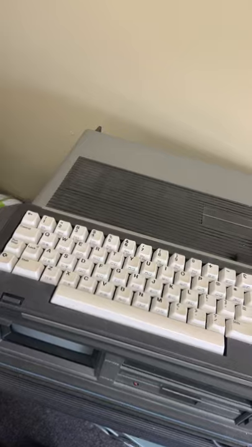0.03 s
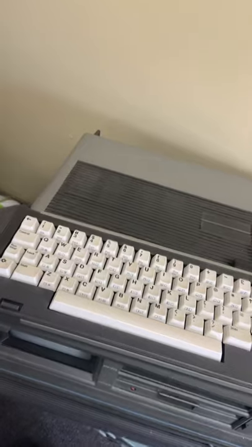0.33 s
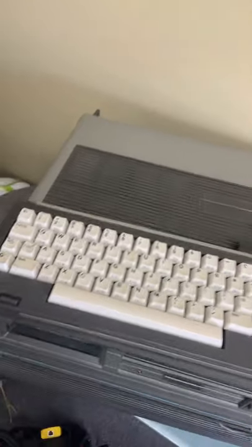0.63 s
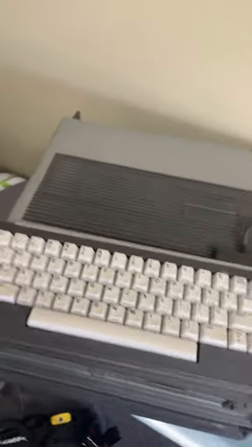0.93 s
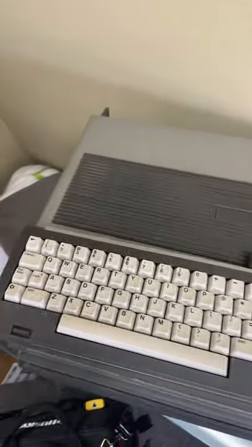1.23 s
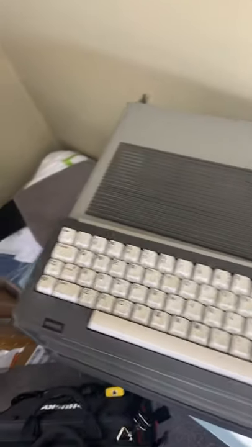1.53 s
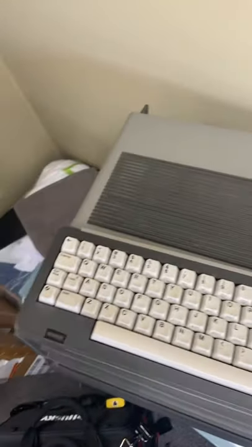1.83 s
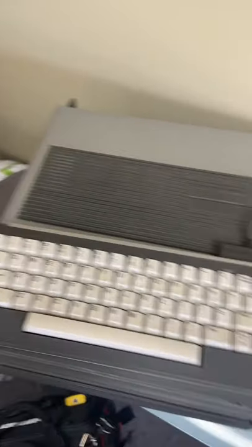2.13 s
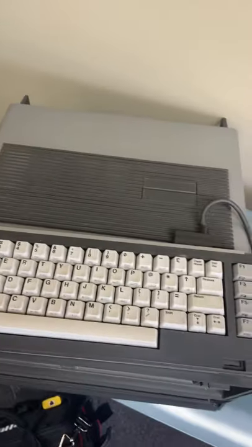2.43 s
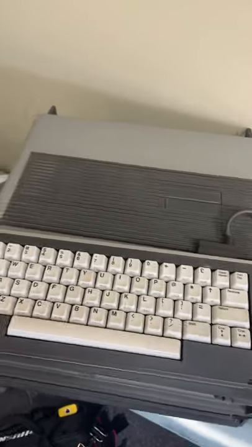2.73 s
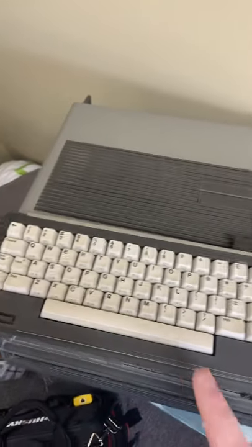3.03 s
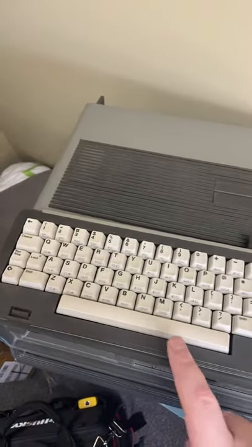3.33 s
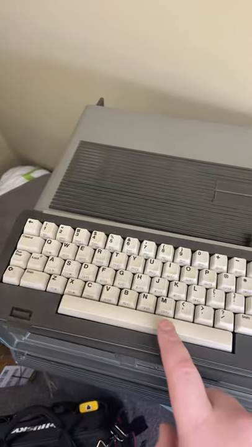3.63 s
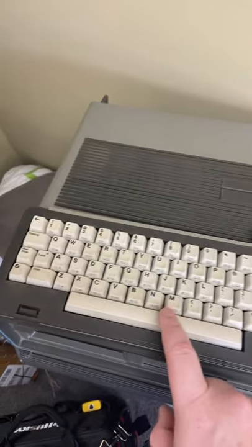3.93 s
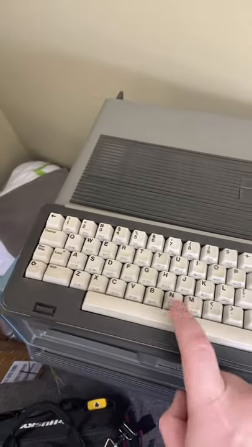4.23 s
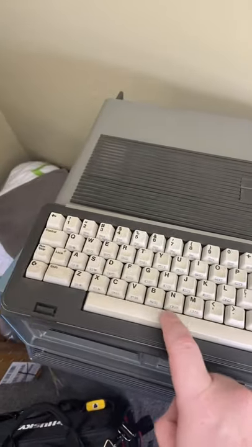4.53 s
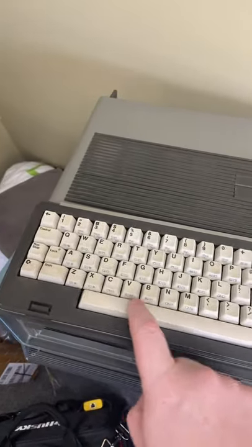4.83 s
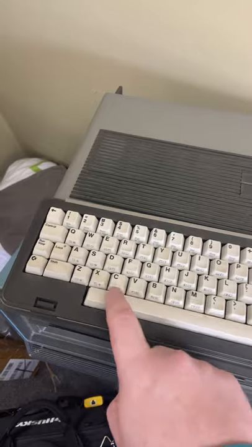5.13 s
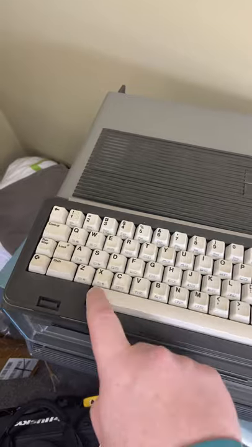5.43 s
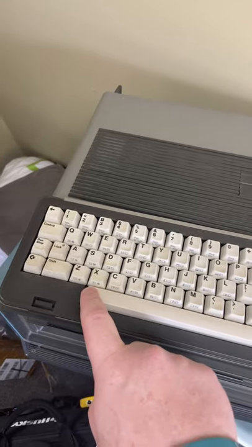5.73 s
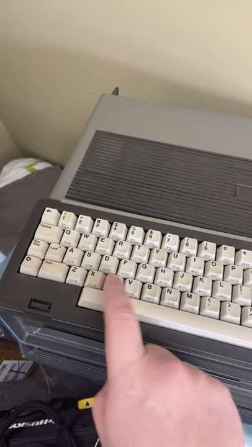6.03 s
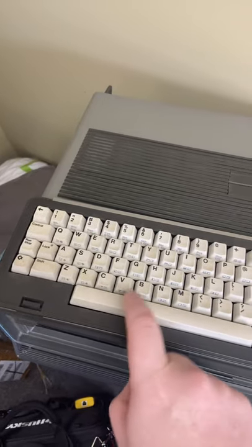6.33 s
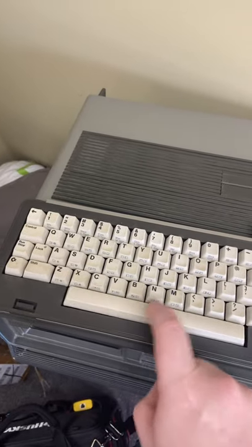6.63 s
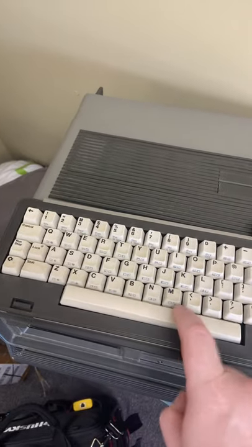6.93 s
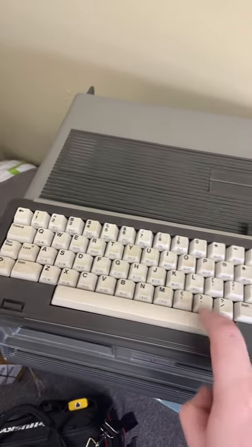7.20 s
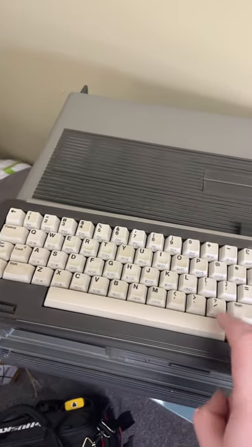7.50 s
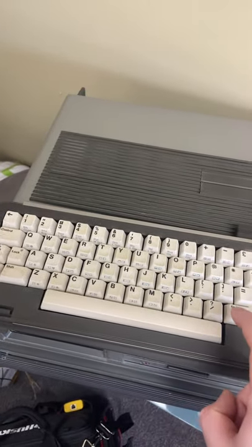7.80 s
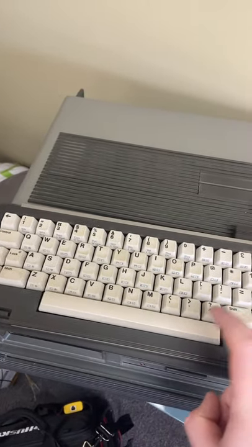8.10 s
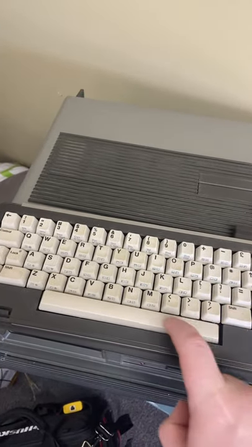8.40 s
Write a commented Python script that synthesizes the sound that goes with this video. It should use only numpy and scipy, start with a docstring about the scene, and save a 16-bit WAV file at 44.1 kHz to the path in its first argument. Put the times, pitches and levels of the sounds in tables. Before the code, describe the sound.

Rapid, rattly clacks of an old keyboard's space bar going down and springing back, over faint room hum.

```python
"""Tapping a loose space bar.

A finger taps along the space bar of an old home computer in a small, quiet room. The bar clacks
against its stops going down and coming up, each blow a flurry of tiny contacts ringing the plastic.
Its stabiliser wire rattles and pings in the clips, and the hollow case thumps underneath.
A faint hum and room rumble lie behind; a sleeve brushes by before the first tap."""
import sys
import numpy as np
from scipy import signal
from scipy.fft import rfft, irfft
from scipy.io import wavfile

SR = 44100
rng = np.random.default_rng(int(sys.argv[2]) if len(sys.argv) > 2 else 0)


def generate_wav(sig):
    """Save sig (samples, or channels by samples) to the path in sys.argv[1] as 16-bit PCM at SR."""
    pcm = np.round(np.clip(np.atleast_2d(sig).T, -1, 1) * 32767).astype(np.int16)
    wavfile.write(sys.argv[1], SR, pcm)


N = 377496


def from_db(db):
    """Decibels to gain."""
    return 10 ** (np.asarray(db) / 20)


def rms_one(x):
    """Scale to rms 1."""
    return x / np.sqrt(np.mean(x ** 2) + 1e-20)


def at_hz(points, hz):
    """Read a curve on a log-frequency axis."""
    known_hz, values = np.transpose(points)
    return np.interp(np.log(np.maximum(hz, 1)), np.log(known_hz), values)


def butter(x, hz, kind, order=2):
    """Causal Butterworth filter."""
    return signal.sosfilt(signal.butter(order, hz, kind, fs=SR, output="sos"), x + 1e-18)


def equalise(x, curve, size=8192):
    """Minimum-phase EQ: nothing sounds ahead of the attack."""
    gain = from_db(at_hz(curve, np.fft.rfftfreq(size, 1 / SR)))
    cepstrum = irfft(np.log(gain))
    cepstrum[1:size // 2] *= 2
    cepstrum[size // 2 + 1:] = 0
    impulse = irfft(np.exp(rfft(cepstrum)))
    return signal.fftconvolve(x, impulse)[:len(x)]


def resonate(x, hz, width_hz):
    """One resonance with unity gain at its peak."""
    radius = np.exp(-np.pi * width_hz / SR)
    feedforward = np.array([1, 0, -1]) * (1 - radius * radius) / 2
    feedback = [1, -2 * radius * np.cos(2 * np.pi * hz / SR), radius * radius]
    return signal.lfilter(feedforward, feedback, x + 1e-18)


def add(track, s, sound):
    """Mix a sound into a track at time s."""
    start = int(s * SR)
    track[start:start + len(sound)] += sound[:N - start]


# Hum tones: (frequency [Hz], line width [Hz], level against the rumble [dB])
HUM_TONES = [(54.9, 8.1, -9.5), (231.2, 4.13, -7.5)]
def hum():
    """Low, steady tones, each blurred by a wandering phase."""
    out = np.zeros(N)
    for hz, width_hz, db in HUM_TONES:
        wander = np.sqrt(2 * np.pi * width_hz / SR) * rng.standard_normal(N)
        phase = np.cumsum(2 * np.pi * hz / SR + butter(wander, 25, "low"))
        out += from_db(db) * rms_one(np.sin(phase))
    return out


# EQ of the rumble: (frequency [Hz], relative level [dB])
RUMBLE_EQ = [(25, -20.5), (45, -2.5), (70, -1.5), (105, -1), (170, -8), (270, -10), (400, -12),
             (650, -16.5), (1000, -19), (1700, -23.5), (3000, -32), (5000, -35.5), (9000, -41),
             (16000, -50.5)]
# Fader ride on rumble and hum: (time [s], level [dB])
ROOM_TONE_FADER = [(0, -100), (.12, -82), (.32, -62.5), (1, -60.5), (2, -61.5), (3, -59.5), (4, -58),
                   (5.8, -56), (8.56, -57)]
def room_tone():
    """A bed of rumble and faint hum that fades in and slowly grows."""
    rumble = rms_one(equalise(rng.standard_normal(N), RUMBLE_EQ))
    fader_db = np.interp(np.arange(N) / SR, *np.transpose(ROOM_TONE_FADER))
    return from_db(fader_db) * (rumble + hum())


# Brushes of cloth as the hand comes in: (peak time [s], half length [s], level [dB])
SLEEVE_BRUSHES = [(3.023, 0.18, -79), (3.6, .12, -83)]
def sleeve(band_hz=(5000, 14900)):
    """Airy cloth hiss that swells and fades with each reach."""
    t = np.arange(N) / SR
    swell = sum(from_db(db) * np.exp(-((t - s) / half_s) ** 2) for s, half_s, db in SLEEVE_BRUSHES)
    return swell * rms_one(butter(rng.standard_normal(N), band_hz, "band"))


def chatter(settle_s, swell_s, per_s, size=5000):
    """A flurry of tiny contacts that swells, then dies as the loose parts settle; energy 1."""
    t = np.arange(size) / SR
    contacts = (rng.random(size) < per_s / SR) * rng.choice([-1, 1], size)
    swell = 1 - np.exp(-(t / swell_s) ** 2)
    return rms_one(contacts * swell * np.exp(-t / settle_s)) / np.sqrt(size)


# The finger lands, shakes the wire and drives the bar onto its stop: (time [s], travel time [s],
# relative rattle level [dB], strength against an ordinary blow [dB], hardness [dB])
TAP_CUES = [(4.131, .008, -40.5, -26, 11), (4.345, 0.0033, -23.5, 2.5, 3.5), (4.534, 0.01, -34.5, -0.5, 5),
            (4.701, 0.014, -30, -2.5, 1.5), (4.860, 0.007, -33, -11.5, 3), (5.009, .011, -37.5, -7.5, 2.5),
            (5.165, 0.0064, -31.5, -16, -9), (5.311, 0.015, -36, -12, 1), (5.447, 0.011, -37.5, -13.5, 3),
            (5.590, .014, -29, -0.5, 9), (6.130, 0.008, -27.5, 2, 5.5), (6.297, 0.011, -27.5, -0.5, 3.5),
            (6.456, .012, -24, 3.5, 2), (6.616, 0.0082, -26, -2, 2.5), (6.78, .008, -25, 2, 1.5),
            (6.932, 0.0083, -23.5, 6.5, 0.5), (7.098, 0.0092, -24, 2, -2.5), (7.268, 0.0077, -22.5, 5, 4),
            (7.417, 0.0084, -29.5, 4.5, 3.5), (7.572, .008, -21.5, 7, 2.5), (8.229, 0.0035, -28, 11, 5.5),
            (8.414, 0.0093, -24.5, -0.5, 2.5)]
# The freed bar shivers as the finger lifts: (time [s], relative rattle level [dB])
LIFT_CUES = [(4.412, -33), (4.429, -36.5), (6.657, -27), (6.864, -24.5), (7.027, -28.5), (7.351, -34.5),
             (7.495, -27), (7.652, -25.5), (8.329, -28), (8.490, -27.5)]
# EQ of the rattle: (frequency [Hz], gain [dB])
RATTLE_EQ = [(150, -9), (700, -6.5), (1500, -14), (2500, -6.5), (3500, 1), (5200, 3.5), (7500, -5),
             (12000, -5), (16000, -5.5)]
def rattles(gain_db=18.0, lead_s=0.003):
    """Force of the wire shaking in its clips, light and bright, as the finger lands or lifts."""
    force = np.zeros(N)
    for s, _, rattle_db, _, _ in TAP_CUES:
        landing = chatter(settle_s=0.012, swell_s=0.0081, per_s=4000)
        add(force, s - lead_s, from_db(rattle_db + gain_db) * landing)
    for s, rattle_db in LIFT_CUES:
        shiver = chatter(settle_s=0.02, swell_s=0.0076, per_s=6600)
        add(force, s - lead_s, from_db(rattle_db + gain_db) * shiver)
    return equalise(force, RATTLE_EQ)


def ticks(gain_db=-18, low_cut_hz=7000, lead_s=0.00074):
    """Force of the first touch: the bar takes up its slack with a thin tick, scaled with the rattle."""
    force = np.zeros(N)
    usual_db = np.mean([rattle_db for _, _, rattle_db, _, _ in TAP_CUES])
    for s, _, rattle_db, _, _ in TAP_CUES:
        tick = chatter(settle_s=0.0097, swell_s=0.0013, per_s=4000)
        add(force, s - lead_s, from_db(gain_db + rattle_db - usual_db) * tick)
    return butter(force, low_cut_hz, "high")


# The bar springs back to its upper stop, a duller knock: (time [s], strength [dB])
RETURN_CUES = [(4.432, -2), (4.621, -0.5), (4.777, -0.5), (4.933, -2.5), (5.086, 1), (5.242, 0),
               (5.391, 2.5), (5.527, 2.5), (5.962, -13), (6.198, 3), (6.363, 3.5), (6.523, 3.5),
               (6.677, 3.5), (6.839, 1.5), (6.998, -2.5), (7.164, -5), (8.31, -3.5), (8.471, -5.5)]
# The finger's path along the bar: (time [s], place [0 left end, 1 right end])
FINGER_PATH = [(4.35, 0.92), (4.6, 0.2), (5.4, 0.13), (6.1, 0), (6.5, 0.13), (7.0, 1), (7.6, 0.58),
               (8.5, 0.43)]
# Mix of an ordinary blow at mid-bar; rows are knock, clack, snap, wire ping and case thump:
# (tap level [dB], return level [dB], growth with strength [dB/dB], growth with hardness [dB/dB],
# change from left end to right end [dB])
BLOW_MIX = [(-33, -34.5, 0.99, -0.77, 0.5), (-39, -41, 1.02, 0.4, 4), (-43.5, -44.5, 1.19, -0.14, 9.5),
            (-46.5, -51, 1.15, -.1, 8), (-50.5, -45.5, 0.5, -0.064, -1)]
def blows():
    """Every blow in order: (time, five layer levels, envelope). The loose right end is brighter."""
    tap_db, return_db, per_strength, per_hardness, rightward_db = np.transpose(BLOW_MIX)
    # Envelopes: (settling time [s], swell stretch [ratio])
    tap_shape = (0.0071, 0.85)   # the fingertip damps the bar a little
    return_shape = (0.0078, 1.3)   # the spring closes the gap more gently than the finger
    down = [(s + travel_s, strength_db, tap_db + per_hardness * hardness_db, tap_shape)
            for s, travel_s, _, strength_db, hardness_db in TAP_CUES]
    up = [(s, strength_db, return_db, return_shape) for s, strength_db in RETURN_CUES]
    rows = []
    for s, strength_db, base_db, shape in down + up:
        off_centre = np.interp(s, *np.transpose(FINGER_PATH)) - 0.5
        layers_db = base_db + per_strength * strength_db + rightward_db * off_centre
        rows.append((s, *layers_db, shape))
    return sorted(rows)


def blow_number(early_s=0.006):
    """For each sample, the number of the blow that is sounding."""
    return np.searchsorted([s for s, *_ in blows()], np.arange(N) / SR + early_s)


def clacks(low_split_hz=2700, high_split_hz=6300, lead_s=0.003):
    """Force of the bar on its stops: a padded blow mostly knocks, a hard one also clacks and snaps."""
    knock, clack, snap = np.zeros((3, N))
    for s, knock_db, clack_db, snap_db, _, _, (settle_s, stretch) in blows():
        start = s - lead_s * stretch   # one end of the bar touches first
        add(knock, start, from_db(knock_db + 27) * chatter(settle_s, 0.0063 * stretch, per_s=7000))
        add(clack, start,
            from_db(clack_db + 32.5) * chatter(settle_s * 1.93, 0.0062 * stretch, per_s=7800))
        add(snap, start, from_db(snap_db + 28.5) * chatter(settle_s, 0.011 * stretch, per_s=3200))
    return (butter(knock, low_split_hz, "low", order=4)
            + butter(clack, [low_split_hz, high_split_hz], "band", order=3)
            + butter(snap, high_split_hz, "high", order=4))


# Dense plastic modes of bar and case, as one EQ: (frequency [Hz], gain [dB])
PLASTIC_EQ = [(120, -12), (250, 0), (450, -6), (800, -2), (1400, 0), (2000, 2), (2800, -3.5), (4600, -2),
              (6300, -5.5), (8000, -2), (10500, -5.5), (12000, -4.5), (13200, -5), (16000, -13.5)]
# Clear resonances of the bar: (frequency [Hz], width [Hz], level against the plastic [dB])
BAR_MODES = [(766, 61, -1.5), (864, 98, -7), (996, 36, 0.5), (1243, 18, 1.5), (1410, 89, -9),
             (1801, 65, -3), (2004, 42, -20), (2346, 27, -19), (2700, 54, -12), (3116, 68, -1),
             (4010, 27, -3), (4350, 46, -2), (4680, 76, -8.5), (5200, 49, 0.5), (5200, 27, -5),
             (5870, 30, -2), (7450, 110, 3.5), (7630, 92, 5.5), (9100, 41, -8), (9830, 130, -5),
             (11600, 130, -6)]
def space_bar(force, vary_db=3.0):
    """Every contact rings the same hollow bar; random mode levels stand for where the finger lands."""
    plastic = equalise(force, PLASTIC_EQ)
    blow = blow_number()
    shares = from_db(vary_db * rng.standard_normal((len(blows()) + 1, len(BAR_MODES))))
    rings = [from_db(db) * resonate(plastic * share[blow], hz, width_hz)
             for (hz, width_hz, db), share in zip(BAR_MODES, shares.T)]
    return plastic + sum(rings)


# Metallic ring of the stabiliser wire: (frequency [Hz], width [Hz], gain [dB])
WIRE_MODES = [(3293, 29, 3), (3368, 34, -5.5)]
def wire(shaking, ping_gain_db=49.0, lag_s=0.0076):
    """The wire pings when a blow twists the bar, and rings lightly whenever it rattles."""
    force = shaking.copy()
    for s, *_, ping_db, _, _ in blows():
        add(force, s + lag_s, from_db([ping_db + ping_gain_db]))
    return sum(from_db(db) * resonate(force, hz, width_hz) for hz, width_hz, db in WIRE_MODES)


# Low body of the hollow case on its stand: (frequency [Hz], width [Hz], gain [dB])
CASE_MODES = [(164, 8.1, 2), (257, 7.2, 7), (298.7, 19.6, 2), (391, 30, -4.5), (480, 28, -5), (618, 44, -6)]
def case_thump(gain_db=47.0, lag_s=0.01199, vary_db=2.5):
    """The case takes the weight just after each clack; random mode levels stand for where it lands."""
    out = np.zeros(N)
    for hz, width_hz, mode_db in CASE_MODES:
        push = np.zeros(N)
        for s, *_, thump_db, _ in blows():
            push_db = thump_db + gain_db + vary_db * rng.uniform(-0.79, 1, 1)
            add(push, s + lag_s, from_db(push_db) * rng.choice([-1, 1]))
        ring = resonate(push, hz, width_hz)
        out += from_db(mode_db) * butter(ring, 2 * hz, "low")   # the fingertip is soft
    return out


# Ringing accents on a few taps: (time [s], pitch [Hz], peak level [dB])
TWANG_CUES = [(4.351, 5240, -35.5), (4.716, 4400, -37), (5.608, 4450, -39), (8.236, 4670, -33)]
def twangs(width_hz=32):
    """A sharp tap makes one resonance of the bar sing out and ring down."""
    out = np.zeros(N)
    t = np.arange(SR // 2) / SR
    decay = np.exp(-np.pi * width_hz * t)
    for s, hz, peak_db in TWANG_CUES:
        add(out, s, from_db(peak_db) * decay * np.sin(2 * np.pi * hz * t))
    return out


# Length of the reverb tail: (frequency [Hz], time to fall 60 dB [s])
REVERB_DECAY = [(150, 0.35), (500, 0.37), (1500, 0.23), (4000, 0.26), (8000, 0.38), (15000, 0.2)]
# Tone of the reverb: (frequency [Hz], level [dB])
REVERB_EQ = [(150, -3), (400, 2), (1000, -7), (4000, -7), (8000, -9), (15000, -7.5)]
def room_response(first_echo_s=0.0067, size=22000):
    """Dense reflections from the near walls; each octave dies at its own rate."""
    t = np.arange(size) / SR
    onset = np.clip(t / first_echo_s - 0.5, 0, 1)
    edges_hz = np.geomspace(80, 18000, 9)
    response = np.zeros(size)
    for low, high in zip(edges_hz, edges_hz[1:]):
        hz = np.sqrt(low * high)
        envelope = onset * from_db(-60 * t / at_hz(REVERB_DECAY, hz))
        echoes = rms_one(envelope * rng.standard_normal(size)) / np.sqrt(size)
        response += from_db(at_hz(REVERB_EQ, hz)) * butter(echoes, [low, high], "band", order=3)
    return response


def room_reverb(x, patterns=4):
    """Hand and microphone move, so the reflections change: blows take echo patterns round-robin."""
    turn = blow_number() % patterns
    return sum(signal.fftconvolve(x * (turn == k), room_response())[:N] for k in range(patterns))


def scene():
    """The keyboard and its reverb over the room tone and the sleeve, in mono."""
    shaking = rattles()
    bar = space_bar(clacks() + ticks() + shaking)
    keyboard = bar + wire(shaking) + case_thump() + twangs()
    return (keyboard + room_reverb(keyboard) + room_tone() + sleeve())[None]


def record(dry, low_cut_hz=46, high_cut_hz=16000):
    """The microphone drops the deep bass; the top is cut steeply."""
    high_cut = signal.ellip(10, 0.1, 70, high_cut_hz, fs=SR, output="sos")
    return signal.sosfilt(high_cut, butter(dry, low_cut_hz, "high", order=6))


dry = scene()
out = record(dry)
generate_wav(out)
```